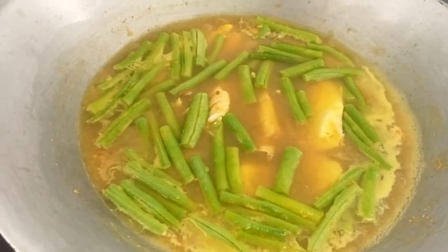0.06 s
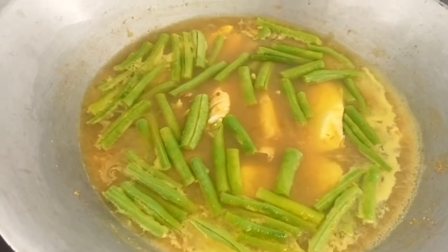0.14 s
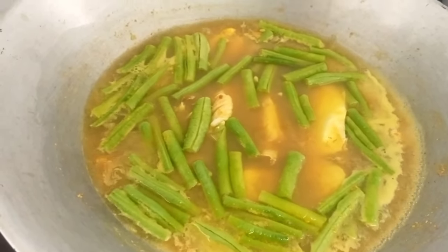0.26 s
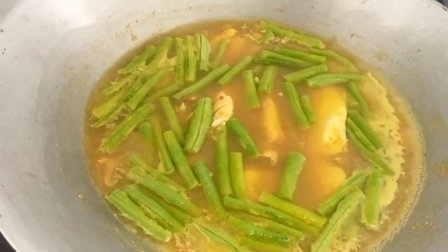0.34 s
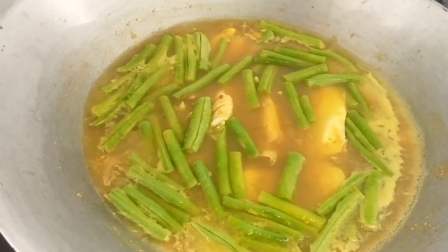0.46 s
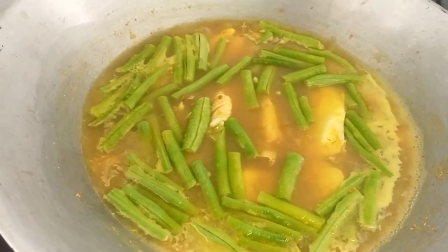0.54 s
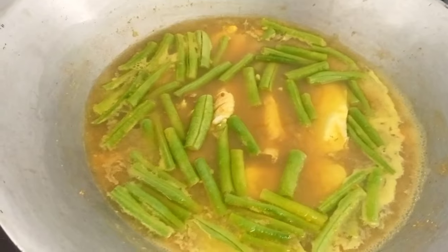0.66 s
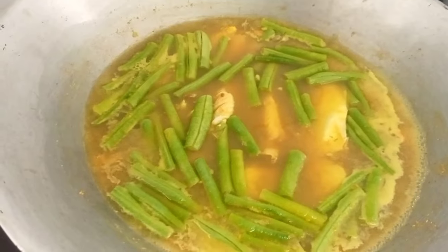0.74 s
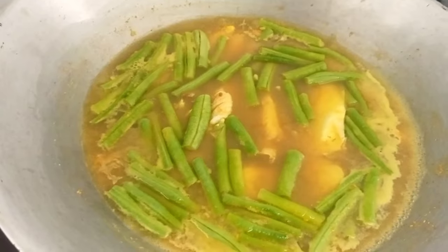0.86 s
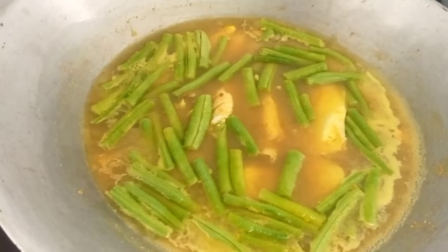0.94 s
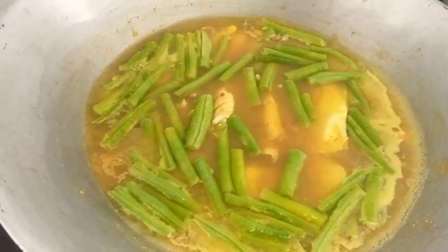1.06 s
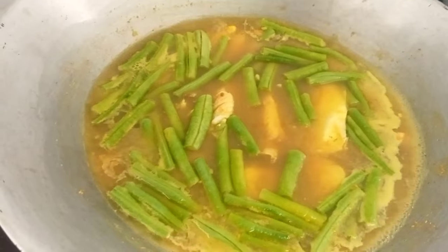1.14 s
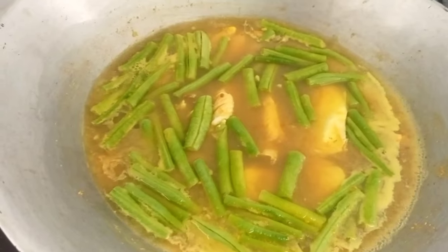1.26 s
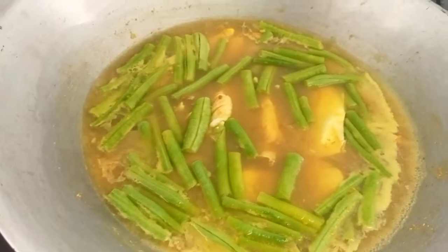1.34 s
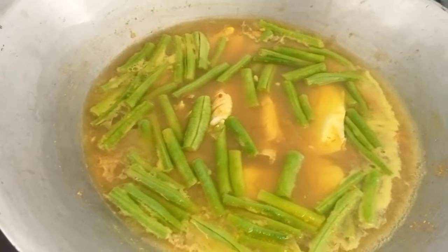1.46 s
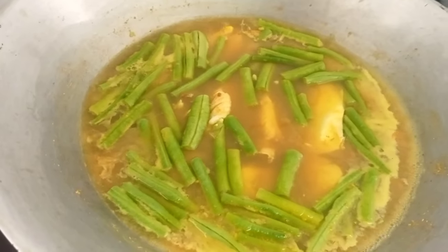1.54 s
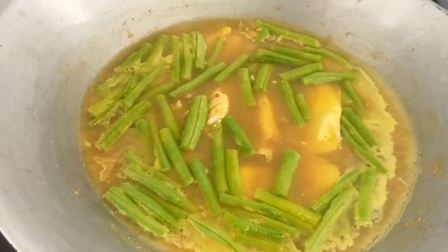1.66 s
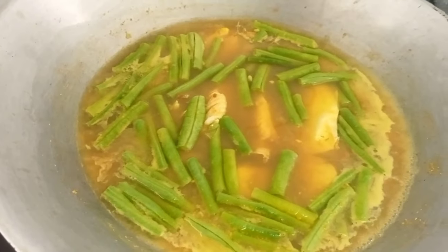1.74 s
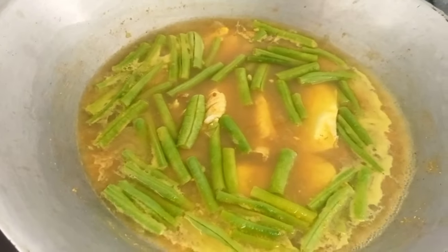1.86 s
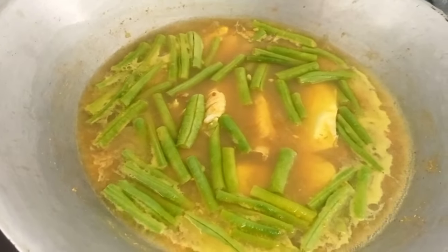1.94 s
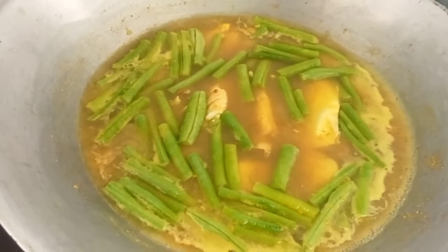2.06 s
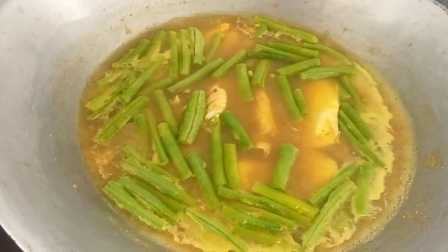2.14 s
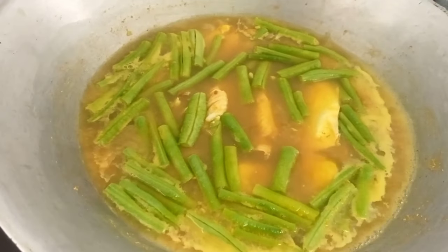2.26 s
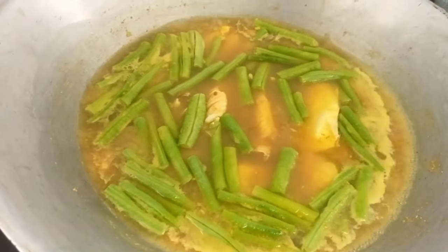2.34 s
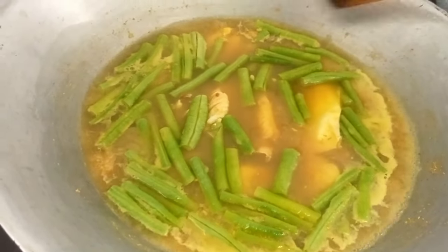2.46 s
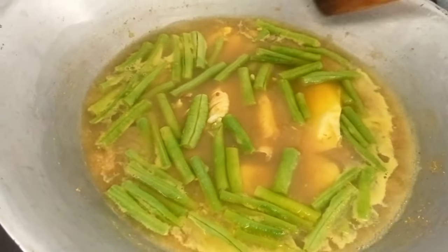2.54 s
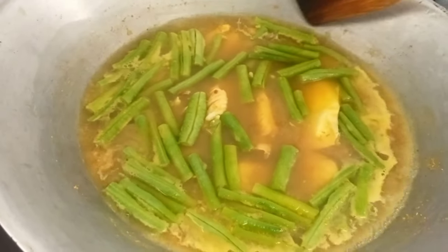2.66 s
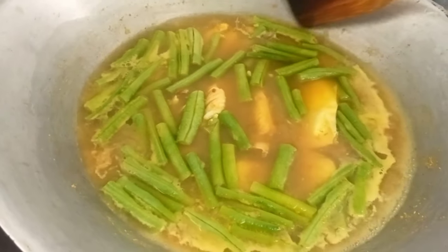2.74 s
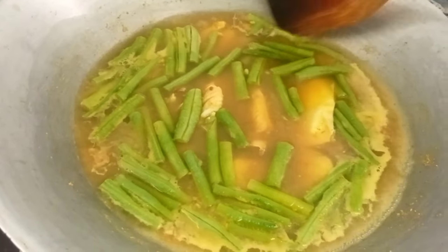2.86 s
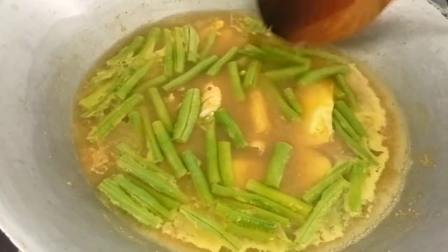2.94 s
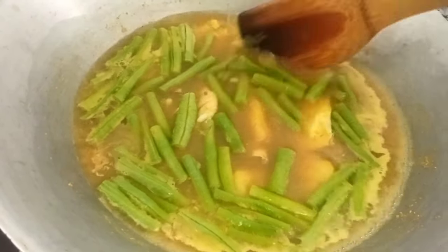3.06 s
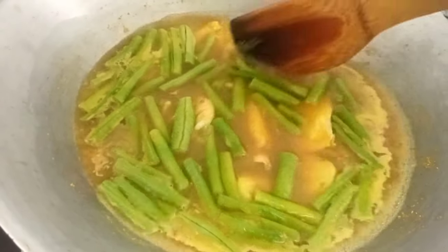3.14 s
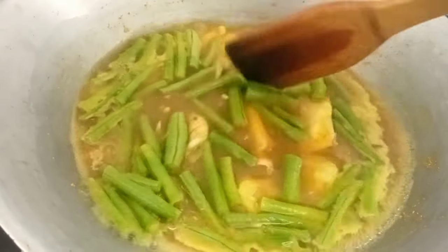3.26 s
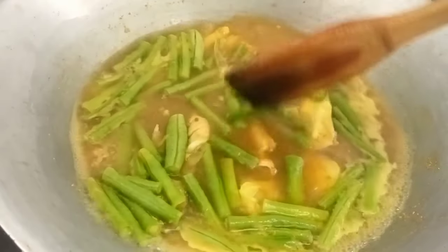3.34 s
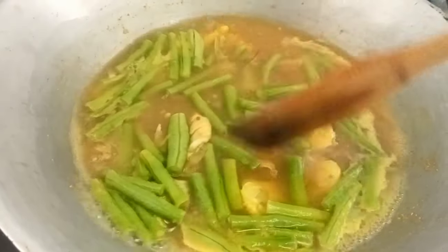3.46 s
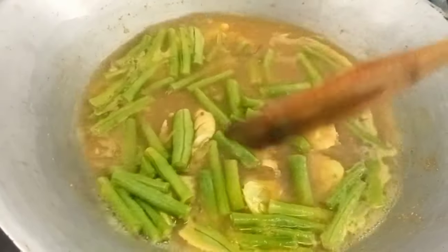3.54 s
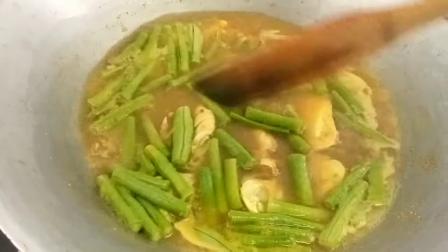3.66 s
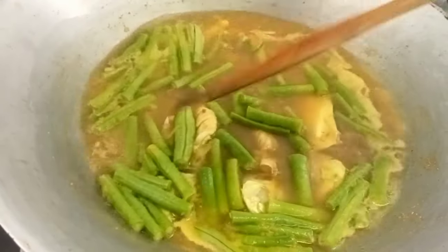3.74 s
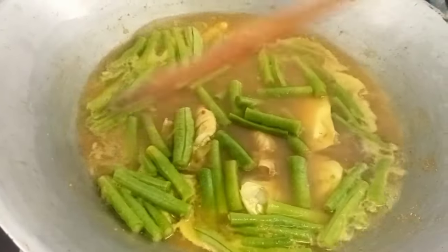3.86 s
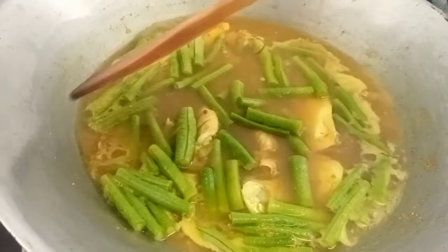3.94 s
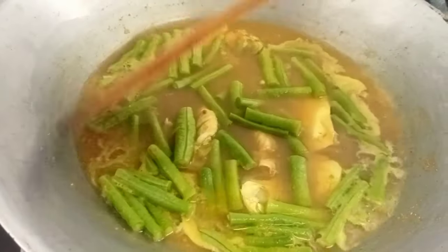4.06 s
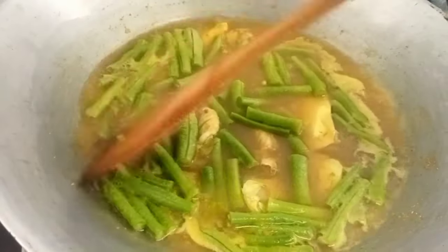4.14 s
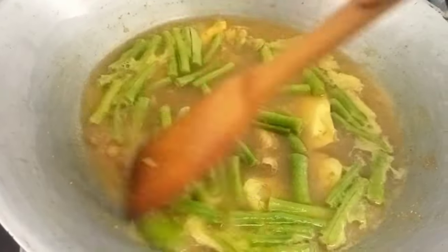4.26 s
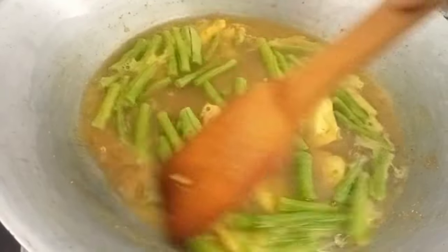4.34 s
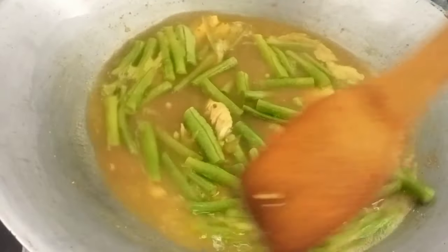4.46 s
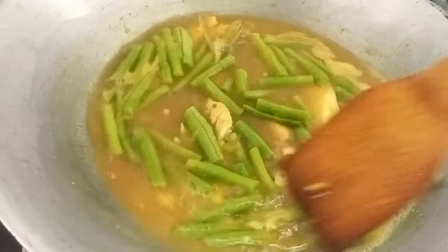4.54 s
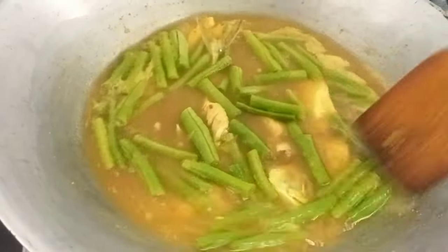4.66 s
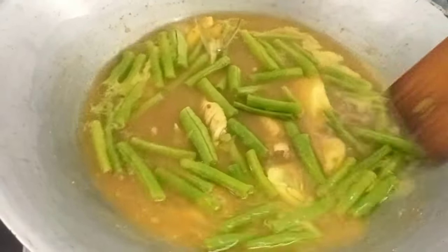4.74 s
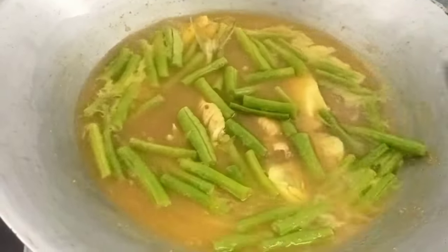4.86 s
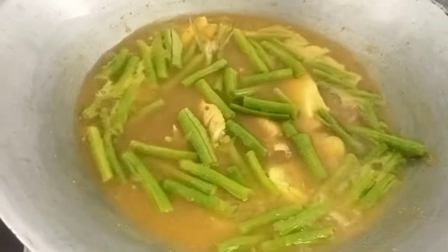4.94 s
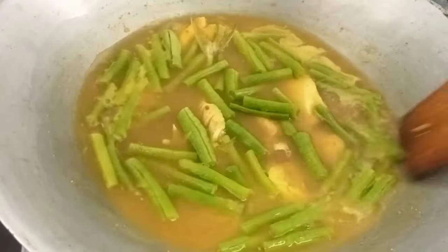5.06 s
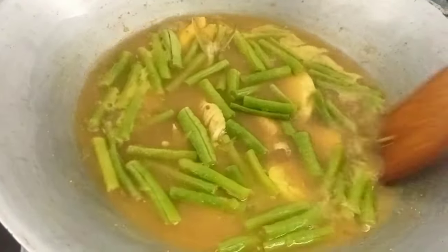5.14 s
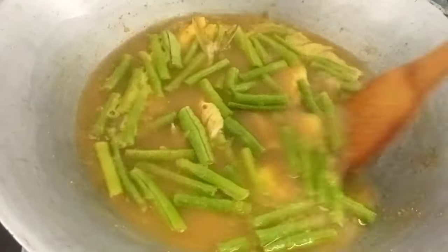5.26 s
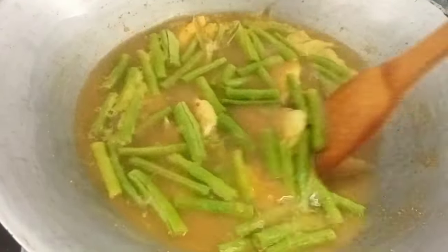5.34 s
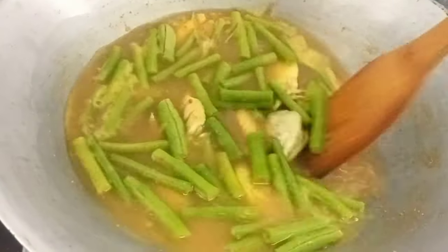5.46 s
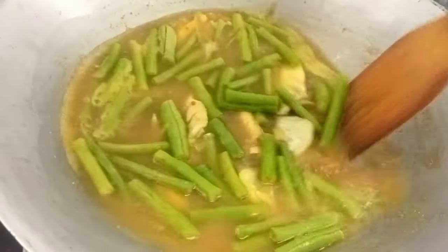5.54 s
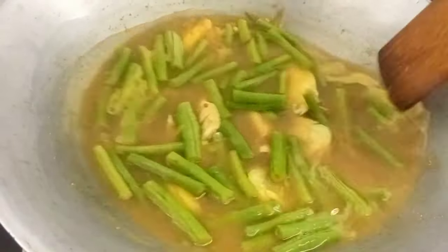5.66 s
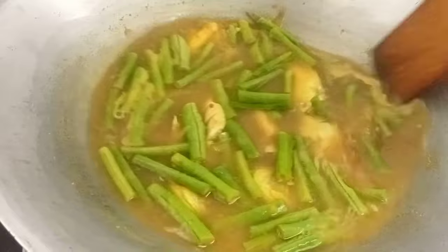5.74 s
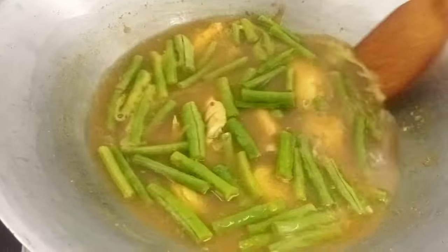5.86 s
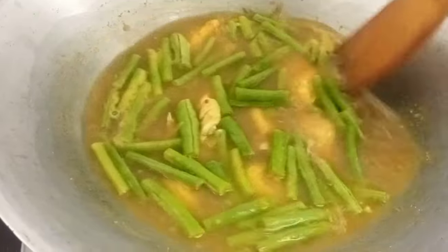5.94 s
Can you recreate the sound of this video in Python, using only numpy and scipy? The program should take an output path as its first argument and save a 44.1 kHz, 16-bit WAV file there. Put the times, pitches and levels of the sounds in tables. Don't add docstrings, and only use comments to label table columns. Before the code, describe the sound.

Close-up bubbling wok on a gas burner; a distant object clunks down early, later wooden stirring brings steamy sizzles, dull knocks and pops.

```python
import sys
import numpy as np
from scipy import signal
from scipy.fft import rfft, irfft, next_fast_len
from scipy.io import wavfile
from scipy.ndimage import uniform_filter1d, map_coordinates

SR = 44100
rng = np.random.default_rng(int(sys.argv[2]) if len(sys.argv) > 2 else 0)


def convert_level_to_amplitude(level_db):
    exponent = np.asarray(level_db, float) / 20
    return 10 ** exponent


def master_out(mix):
    frames = np.transpose(np.atleast_2d(mix))
    ceiling = np.clip(frames, -1, 1)
    pcm = np.round(ceiling * 32767).astype(np.int16)
    wavfile.write(sys.argv[1], SR, pcm)


N = 265036

# time in seconds, level in dB.
VIGOUR = [(0, 2), (.3, 1), (.7, 1.5), (1.1, 0), (2.0, 1), (2.6, 0.5), (2.9, 0), (3.45, -1), (3.7, -2),
          (3.85, -3.5), (4.0, -2.5), (4.2, -2), (4.66, -2), (5.2, -4.5), (5.7, -6), (5.9, -8), (6.01, -4.5)]
# frequency in Hz, density in dB per Hz.
HISS_COLOUR = [(300, -33), (500, -18), (1000, -19.5), (1250, -16), (1600, -18), (2500, -10), (3300, -14.5),
               (4500, -18), (5500, -14.5), (7000, -7.5), (8000, -3), (9200, -12.5), (11000, -31),
               (16000, -18.5)]
# frequency in Hz, density in dB per Hz.
FROTH_COLOUR = [(6000, -52), (8500, -2), (9800, 4), (11500, 0.5), (13500, 7), (14800, 1.5), (16000, 2.5)]

# start in seconds, rise in seconds, hold in seconds,
# fall in dB per second, sizzle level in dB.
STROKES = [
    (2.887, 0.22, 0.055, 50.5, -36),
    (4.195, 0.019, .29, 92, -42),
    (4.721, 0.019, 0.12, 184, -29),
    (4.9, 0.023, .0, 85, -42),
    (5.07, .012, 0, 306, -48),
    (5.235, 0.013, 0.027, 180, -48),
    (5.31, .075, 0.036, 51, -48),
    (5.51, 0.049, .0, 200, -46),
    (5.9, .02, 0.017, 400, -59),
]
# start in seconds, level in dB.
DRAGS = [(5.075, -59), (5.325, -56), (5.37, -56.5), (5.535, -54), (3.11, -53.5), (4.78, -53)]
# start in seconds, rise in seconds, fall in dB per second, level in dB.
SPITS = [(4.22, 0.11, 32, -52), (4.7225, .006, 127, -32), (5.24, 0.011, 300, -46), (5.53, .035, 200, -56),
         (5.95, .012, 150, -59), (3.44, 0.025, 60, -56), (3.64, 0.044, 77, -56), (3.9, .06, 60, -56),
         (5.4, .06, 60, -62), (5.805, .01, 297, -60)]
# frequency in Hz, density in dB per Hz.
SIZZLE_COLOUR = [(2240, -23.5), (3800, -10), (4600, -9.5), (5200, -6.5), (5570, -5.5), (6140, -4.5),
                 (7350, 0.5), (7760, 4), (8420, -2.5), (10500, -13), (13600, -34), (22000, -120)]
# frequency in Hz, density in dB per Hz.
SCRAPE_COLOUR = [(530, -14), (900, -14), (1090, -30), (1240, -4), (1420, -18), (1670, -11.5), (2310, 1),
                 (2720, 2), (3280, -0.5), (4500, -20), (5850, -44), (9900, -120)]

# start in seconds, length in seconds, level in dB,
# upper modes in dB.
SKIDS = [
    (4.204, 0.066, -60.5, -5),
    (5.075, 0.034, -59.5, 1.5),
    (5.166, 0.017, -72, 19.5),
]
# frequency in Hz, width in Hz, level in dB.
EDGE_MODES = [(1284, 120, 0), (2150, 120, -7), (2640, 92, 1), (3070, 80, 6)]

# time in seconds, peak in dB, wooden tap in dB, rocking mode in dB,
# bowl mode in dB.
KNOCKS = [
    (3.019, -47, -9, 3, -5),
    (3.406, -56.5, -13, -2, 5),
    (3.948, -30, -6.5, -5, -2.5),
    (4.477, -62, 13, 8, -8),
    (4.735, -50.5, -5, 16, 6.5),
    (5.139, -55, -13, 0, 6.5),
    (5.549, -49, -11, 6, 7.5),
]
# frequency in Hz, level in dB, 60 dB decay time in seconds.
WOK_MODES = [(131, -2, 0.95), (201, -2, 1.0), (227, 4.5, 0.13), (290, 0.5, 0.17), (373.5, -3, 0.15),
             (445, -6, 0.15), (623, -9, 0.12), (781, -13, 0.25), (890, -12, 0.15)]

# time in seconds, peak in dB, pitch in Hz, length in cycles.
BUBBLES = [(2.080, -42, 11500, 2.5), (2.245, -37, 4500, 1.2), (2.975, -43, 2240, 3.5),
           (3.658, -42, 11100, 2.5), (3.929, -33.5, 2670, 1.6), (4.086, -45.5, 1350, 2.9),
           (4.376, -30, 1840, 0.82), (4.7427, -9, 8200, 3.5), (5.172, -35.5, 2900, 1.9),
           (5.443, -40, 10900, 2.5), (5.486, -44, 2500, 3.5), (5.543, -40, 1100, 0.69),
           (5.689, -42, 10000, 2.5), (5.841, -40.5, 2630, 1.6), (5.846, -42, 12500, 2.5),
           (5.929, -44, 12000, 2.5)]

# frequency in Hz, density in dB per Hz.
BURNER_COLOUR = [(15, -55), (25, -27), (59, -5), (118, -3), (189, -3), (262, -11.5), (303, -8), (440, -13),
                 (659, -16.5), (1000, -23), (1200, -21.5), (1560, -30), (2640, -120)]
# frequency in Hz, width in Hz, level in dB.
JET_MODES = [(8040, 450, 0)]
# start in seconds, length in seconds, level in dB.
SHADES = [(4.15, 0.4, -12), (1.1, .1, -13)]

# time in seconds, body in dB, edge in dB, tick in dB.
THUDS = [
    (.434, -31, -36.5, -60),
    (0.4433, -39.5, -68, -36),
    (.478, -33.5, -48.5, -50),
    (.493, -31, -73, -70),
    (.503, -42.5, -72, -70),
    (.512, -37, -60, -70),
]
# frequency in Hz, width in Hz, level in dB.
OBJECT_MODES = [(137.2, 5.3, -6.5), (235.6, 7.4, -1.5), (366, 28, -13.5), (590, 82, -9), (790, 210, -14.5),
                (1080, 80, -9.5), (1570, 58, -6.5), (1980, 120, -19), (2280, 106, -12), (2636, 67, -15.5),
                (3170, 280, -20), (4040, 200, -8), (4770, 240, -14), (5500, 130, 0)]
# start in seconds, rise in seconds, fall in dB per second, bright part in dB,
# dull part in dB.
RUSTLE = [
    (0.0, 0.057, 55, -48, -59),
    (.95, 0.032, 142, -60, -51),
]
# frequency in Hz, density in dB per Hz.
BRIGHT_COLOUR = [(1470, -41), (2500, -7), (3370, -4), (3700, 1.5), (4460, 0.5), (6500, -5), (8450, -35),
                 (14300, -120)]
# frequency in Hz, density in dB per Hz.
DULL_COLOUR = [(240, -55), (400, -36), (660, 0), (992, -13.5), (1060, -24), (1200, -19), (2600, -9),
               (3380, -12), (5720, -120)]

# frequency in Hz, 60 dB decay time in seconds.
ROOM_DECAY = [(200, 0.58), (1500, 0.43), (3000, 0.63), (6000, 0.088)]
# time in seconds, low edge in Hz, high edge in Hz,
# level in dB.
BLIPS = [(.27, 12300, 13900, -57), (.27, 4200, 5260, -66), (.595, 6800, 8400, -51),
         (.69, 10300, 11800, -60), (.895, 10300, 11700, -65), (1.71, 5600, 7640, -56),
         (2.8, 5160, 7000, -58), (3.285, 10300, 11800, -60), (3.285, 6200, 7700, -51),
         (3.33, 5160, 7000, -52), (4.26, 8200, 9800, -56), (4.49, 7500, 9060, -50), (4.49, 4600, 5800, -58)]


def unit(x):
    return x / np.sqrt(np.mean(x ** 2) + 1e-20)


def along(points, hz):
    f, value = np.transpose(points)
    return np.interp(np.log(hz + 1), np.log(f + 1), value)


def vigour():
    s, db = np.transpose(VIGOUR)
    return np.interp(np.arange(N) / SR, s, db)


def wobble(rate, count=N):
    knots = rng.standard_normal(int(count * rate / SR) + 4)
    return map_coordinates(knots, [np.arange(count) * rate / SR])


def swell(s, rise, hold, fall_db, db, sag_db=0):
    t = np.arange(N) / SR - s
    hold = max(hold, 0)
    loss_db = sag_db * np.clip(t - rise, 0, hold) + fall_db * np.maximum(t - rise - hold, 0)
    return np.clip(t / max(rise, 1 / SR), 0, 1) * convert_level_to_amplitude(db - loss_db)


def filtered(x, response):
    m = next_fast_len(N + SR)
    return irfft(rfft(x, m) * response(np.fft.rfftfreq(m, 1 / SR)), m)[:N]


def resonant(x, modes):
    def response(f):
        total = 0
        for k, (centre, width, db) in enumerate(modes):
            loss = 1j * f * width
            total = total + (-1) ** k * convert_level_to_amplitude(db) * loss / (centre * centre - f * f + loss)
        return total
    return filtered(x, response)


def bursts(colour, spread_db, patchy_db):
    sizes = np.minimum(rng.exponential(size=N // 8 + 1), 5)
    ticks = rng.standard_normal(N) * convert_level_to_amplitude(spread_db * np.repeat(sizes, 8)[:N])
    z = signal.stft(ticks, nperseg=512)[2]
    patches = uniform_filter1d(rng.standard_normal(z.shape), size=8, axis=0)
    patches = unit(uniform_filter1d(patches, size=10, axis=1))
    ticks = signal.istft(z * convert_level_to_amplitude(patchy_db * patches), nperseg=512)[1][:N]
    return unit(filtered(ticks, lambda hz: convert_level_to_amplitude(along(colour, hz))))


def simmer():
    vigour_db = vigour()
    forming = np.clip(1 - np.arange(N) / SR / 0.23, 0, 1)
    hiss_db = -55 + vigour_db
    froth_db = -53 + 2.1 * vigour_db - 3 * forming
    boil = wobble(15)
    hiss_gain = convert_level_to_amplitude(hiss_db + 6 + 0.41 * boil + 0.073 * wobble(5.2))
    froth_gain = convert_level_to_amplitude(froth_db + 1.0 + 0.5 * boil + 0.74 * wobble(11))
    hiss = hiss_gain * bursts(HISS_COLOUR, spread_db=1.0, patchy_db=1.54)
    froth = froth_gain * bursts(FROTH_COLOUR, spread_db=2.5, patchy_db=1.7)
    return hiss + froth


def strokes():
    scrape_db, spit_db = -10.5, -7.5
    push = np.max([swell(*row, sag_db=12.5) for row in STROKES], axis=0)
    bite = sum(swell(s, 0.011, 0, 168, db) for s, db in DRAGS)
    drops = sum(swell(s, rise, 0, fall_db, db) for s, rise, fall_db, db in SPITS)
    sizzle = push * bursts(SIZZLE_COLOUR, spread_db=0.5, patchy_db=0.84)
    scrape = (convert_level_to_amplitude(scrape_db) * push + bite) * bursts(SCRAPE_COLOUR, spread_db=2.0, patchy_db=0.5)
    spit = (convert_level_to_amplitude(spit_db) * push + drops) * bursts(FROTH_COLOUR, spread_db=1.0, patchy_db=-0.5)
    return convert_level_to_amplitude(0.14 * wobble(40)) * (sizzle + scrape + spit)


def shell(x, depth_db, spacing_hz):
    knots = np.clip(rng.standard_normal(SR // 40), -1.6, 1.6)
    return filtered(x, lambda hz: convert_level_to_amplitude(depth_db * map_coordinates(knots, [hz / spacing_hz])))


def skids():
    t, out = np.arange(N) / SR, np.zeros(N)
    low = unit(resonant(rng.standard_normal(N), EDGE_MODES[:1]))
    high = unit(resonant(rng.standard_normal(N), EDGE_MODES[1:]))
    for s, length, db, upper_db in SKIDS:
        gate = np.clip((t - s) / 0.003, 0, 1) * np.clip((s + length - t) / 0.011, 0, 1)
        out += convert_level_to_amplitude(db) * gate * (low + convert_level_to_amplitude(upper_db) * high)
    return out


def knocks():
    out, t = np.zeros(N + 2 * SR), np.arange(SR) / SR
    for s, db, tap_db, rock_db, bowl_db in KNOCKS:
        extra_db = [rock_db, bowl_db] + [0] * len(WOK_MODES)
        ring = np.zeros(SR)
        for (hz, level_db, t60), more_db in zip(WOK_MODES, extra_db):
            slosh = convert_level_to_amplitude(2.1 * wobble(hz / 6, count=SR))
            ring += slosh * convert_level_to_amplitude(level_db + more_db - 60 * t / t60) * np.sin(2 * np.pi * hz * t)
        wood = unit(signal.lfilter([1], [1, -1.86, 0.875], rng.standard_normal(len(t))))
        tap = wood * convert_level_to_amplitude(tap_db - 60 * t / 0.08)
        onset = 1 - np.exp(-t / 0.0028)
        out[round(s * SR):][:len(t)] += convert_level_to_amplitude(db - 4) * onset * (ring + tap)
    return out[:N]


def pops():
    out, t = np.zeros(N + SR), np.arange(SR // 20) / SR
    for s, db, hz, cycles in BUBBLES:
        age = hz * t / cycles
        shape = age * np.exp(1 - 2.5 * age) * 2.5
        rising = 1 + 0.039 * np.minimum(age, 1)
        out[round(s * SR):][:len(t)] += convert_level_to_amplitude(db) * shape * np.sin(2 * np.pi * hz * t * rising)
    return out[:N]


def flame():
    t = np.arange(N) / SR
    shade_db = sum(db * np.exp(-((t - s - length) / length) ** 2 * 2) for s, length, db in SHADES)
    hiss_band = unit(resonant(resonant(rng.standard_normal(N), JET_MODES), JET_MODES))
    jet = convert_level_to_amplitude(-52.5 + 0.37 * vigour() + shade_db) * hiss_band
    rumble = convert_level_to_amplitude(-54 + 0.63 * wobble(7.3)) * bursts(BURNER_COLOUR, spread_db=0.5, patchy_db=1.5)
    return rumble + jet


def set_down():
    rest_s = 0.519
    body, edge, tick = np.zeros((3, N))
    for s, body_db, edge_db, tick_db in THUDS:
        at = round(s * SR)
        body[at] = convert_level_to_amplitude(body_db + 61.5)
        edge[at] = convert_level_to_amplitude(edge_db + 52.5)
        tick[at] = convert_level_to_amplitude(tick_db + 41.5)
    soft = signal.lfilter(np.hanning(60) / 30, 1, body)
    held = convert_level_to_amplitude(-600 * np.maximum(np.arange(N) / SR - rest_s, 0))
    body = held * resonant(soft, OBJECT_MODES[:3])
    return body, resonant(edge, OBJECT_MODES[3:11]), resonant(tick, OBJECT_MODES[11:])


def handling():
    bright = sum(swell(s, rise, 0, fall_db, db) for s, rise, fall_db, db, _ in RUSTLE)
    dull = sum(swell(s, rise, 0, fall_db, db) for s, rise, fall_db, _, db in RUSTLE)
    bright_noise = bursts(BRIGHT_COLOUR, spread_db=3.0, patchy_db=0.5)
    dull_noise = bursts(DULL_COLOUR, spread_db=0.5, patchy_db=3.0)
    return bright * bright_noise + dull * dull_noise


def kitchen(x):
    hz, t, z = signal.stft(rng.standard_normal(SR), SR, nperseg=256)
    decay = convert_level_to_amplitude(-60 * t / along(ROOM_DECAY, hz)[:, None])
    tail = signal.istft(z * decay, SR, nperseg=256)[1]
    late = np.pad(x, (200, 0))
    return signal.fftconvolve(late, tail / np.linalg.norm(tail))[:N]


def blips():
    length_s = 0.046
    out, count = np.zeros(N), round(length_s * SR)
    hz = np.fft.rfftfreq(count, 1 / SR)
    for s, low_hz, high_hz, db in BLIPS:
        inside = (hz > low_hz) * (hz < high_hz)
        band = irfft(rfft(rng.standard_normal(count)) * inside, count)
        out[round((s - length_s / 2) * SR):][:count] += convert_level_to_amplitude(db) * np.hanning(count) * unit(band)
    return out * [[1], [-1]]


def scene():
    body, edge, tick = set_down()
    near = pops() + knocks() + skids()
    wet = kitchen(convert_level_to_amplitude(-9.5) * body + convert_level_to_amplitude(2.0) * edge + convert_level_to_amplitude(-4) * tick + convert_level_to_amplitude(-7.0) * near)
    wok = shell(simmer() + strokes(), depth_db=2.0, spacing_hz=47.6) + near
    far = body + convert_level_to_amplitude(-6.5) * edge + tick + handling()
    mono = wok + flame() + far + wet
    return np.array([mono, mono])


def low_pass(x):
    return signal.sosfilt(signal.butter(12, 16650, fs=SR, output="sos"), x)


def record(dry):
    ceiling = 0.22
    cut = signal.sosfilt(signal.butter(2, 45, "highpass", fs=SR, output="sos"), dry)
    cut = cut / (1 + np.abs(cut / ceiling) ** 4) ** 0.25
    cut = cut + blips()
    mix = np.array([filtered(channel, lambda hz: hz < 15500) for channel in cut])
    return low_pass(mix)


dry = scene()
out = record(dry)
master_out(out)
```